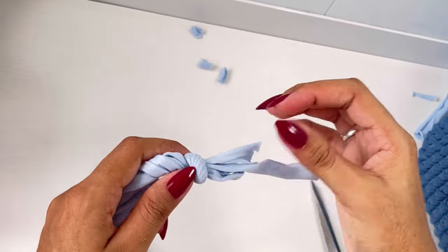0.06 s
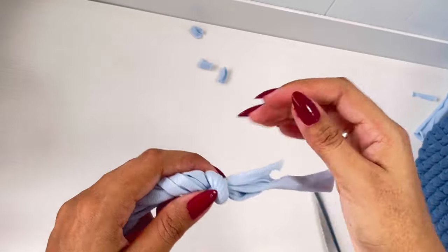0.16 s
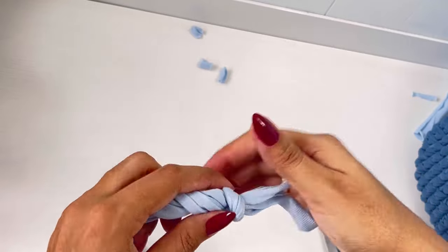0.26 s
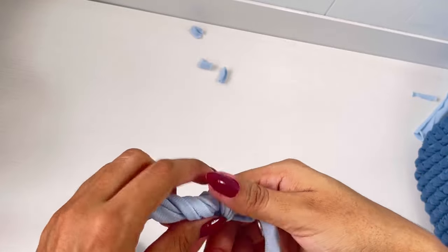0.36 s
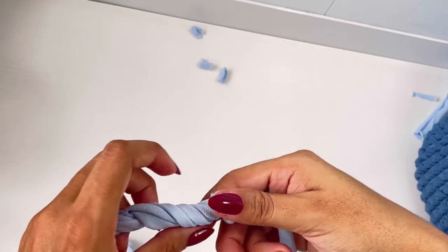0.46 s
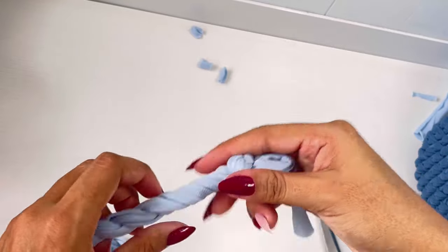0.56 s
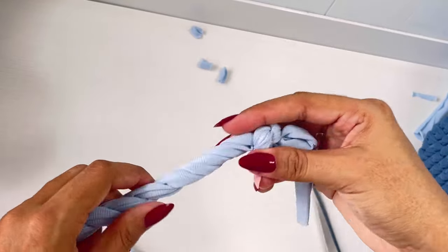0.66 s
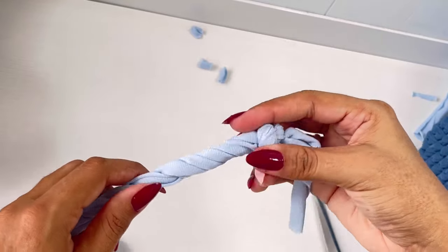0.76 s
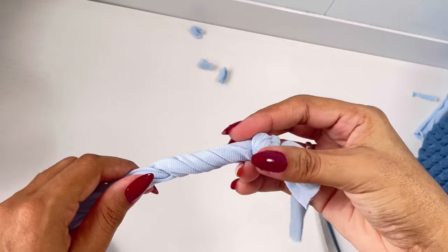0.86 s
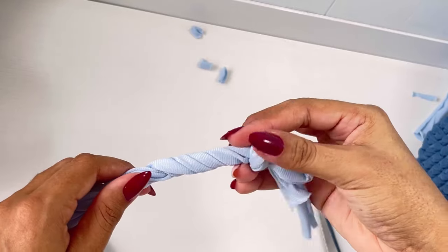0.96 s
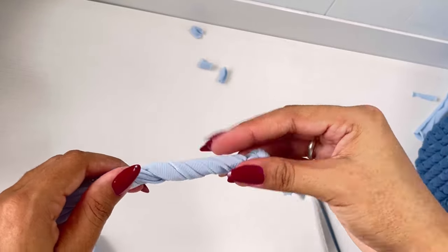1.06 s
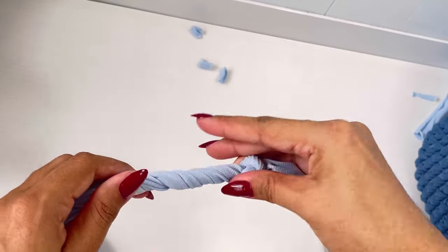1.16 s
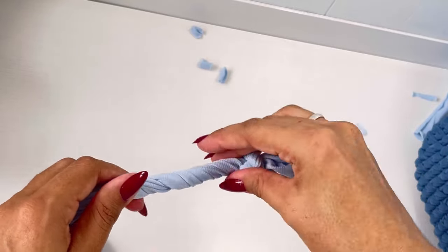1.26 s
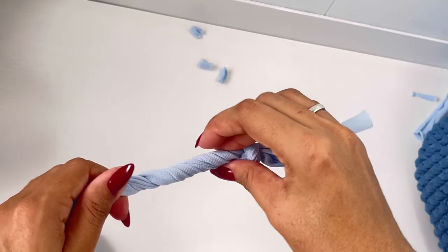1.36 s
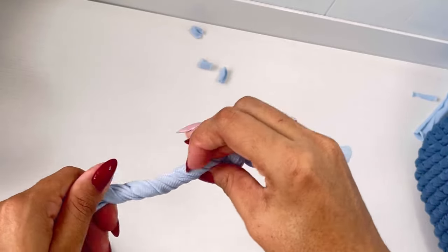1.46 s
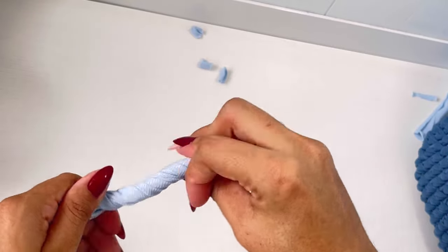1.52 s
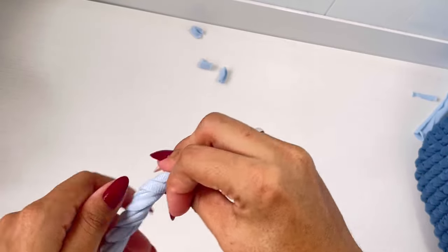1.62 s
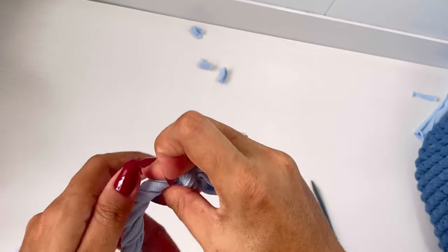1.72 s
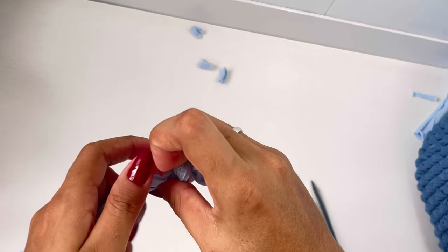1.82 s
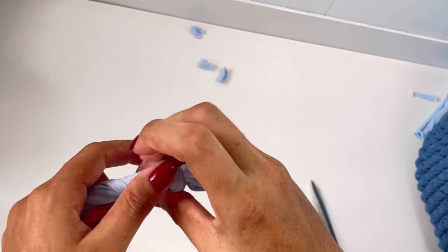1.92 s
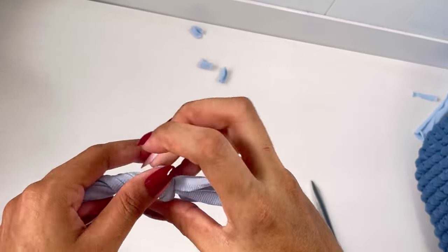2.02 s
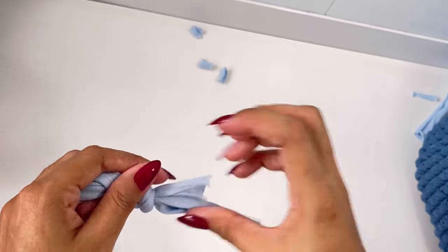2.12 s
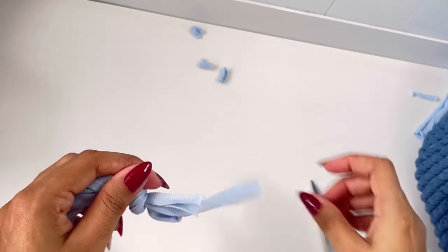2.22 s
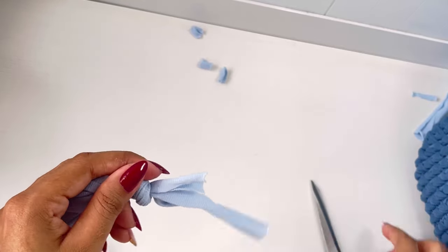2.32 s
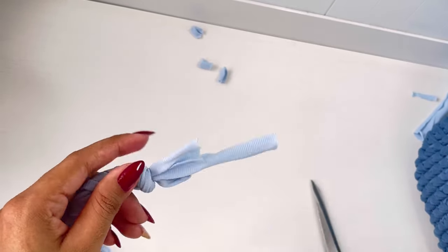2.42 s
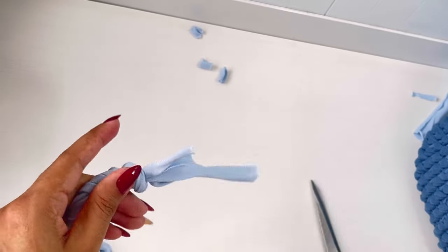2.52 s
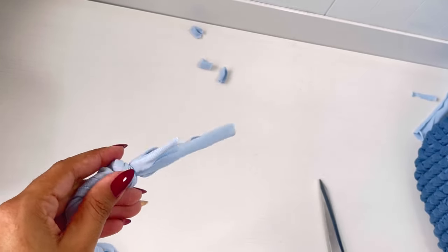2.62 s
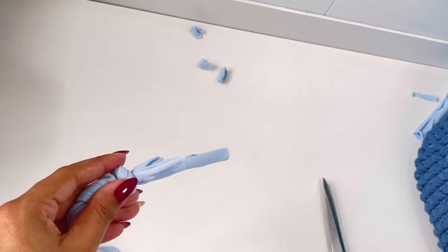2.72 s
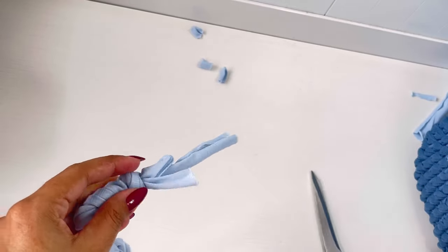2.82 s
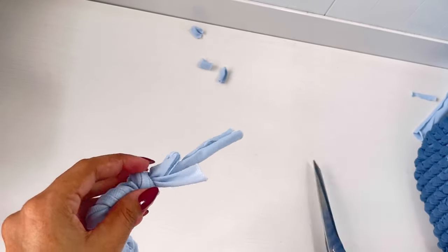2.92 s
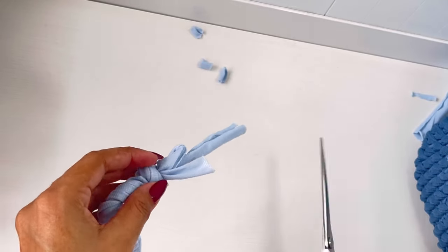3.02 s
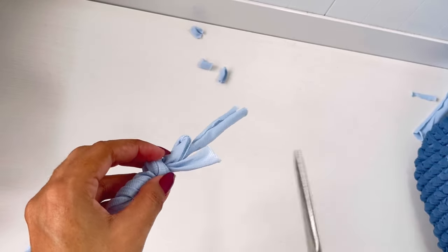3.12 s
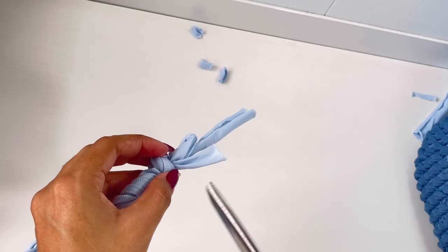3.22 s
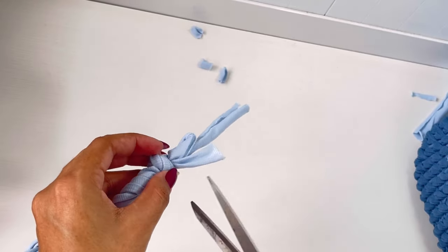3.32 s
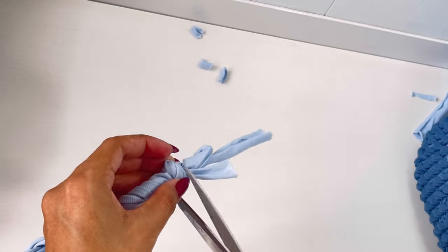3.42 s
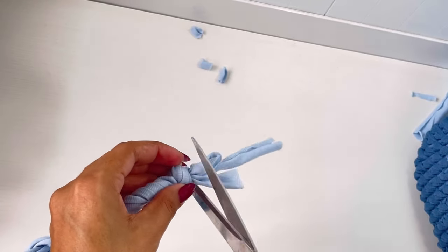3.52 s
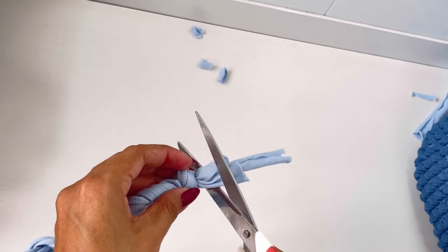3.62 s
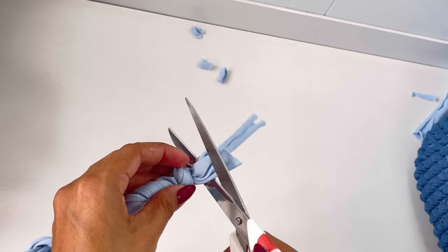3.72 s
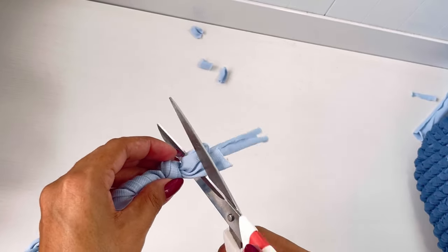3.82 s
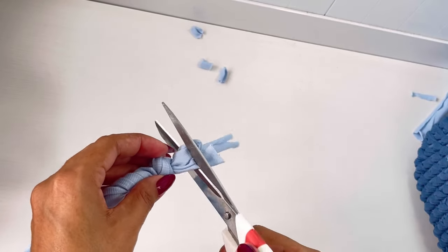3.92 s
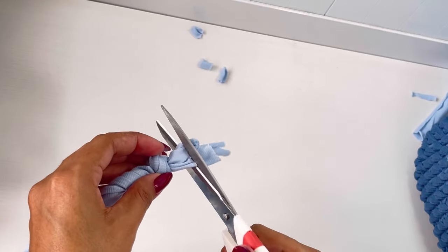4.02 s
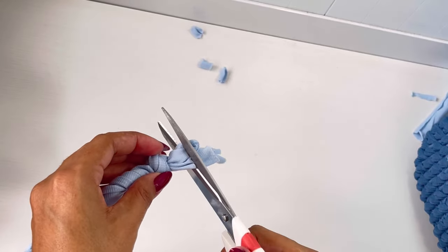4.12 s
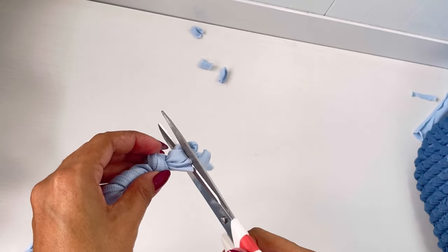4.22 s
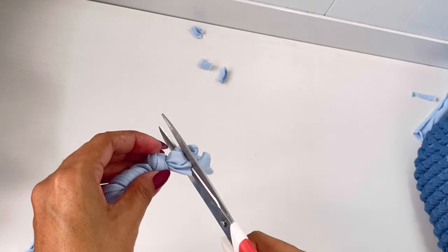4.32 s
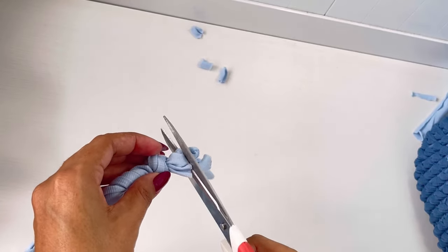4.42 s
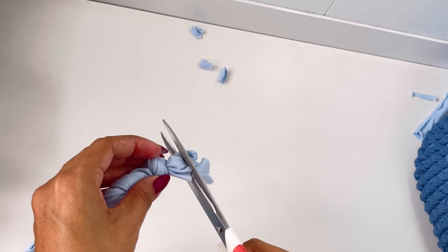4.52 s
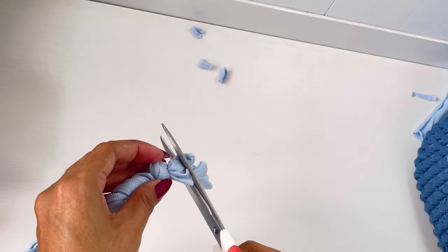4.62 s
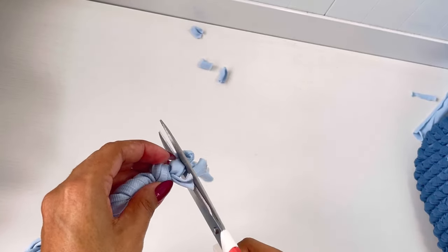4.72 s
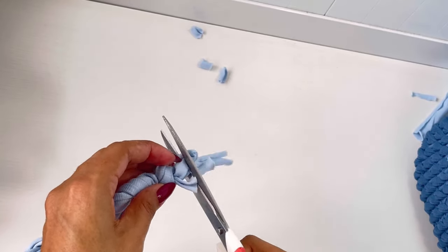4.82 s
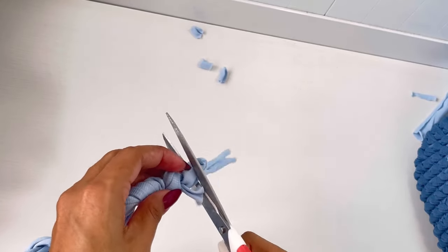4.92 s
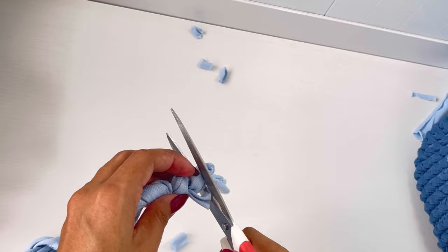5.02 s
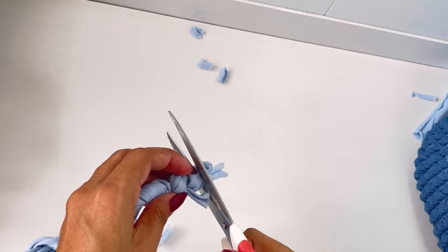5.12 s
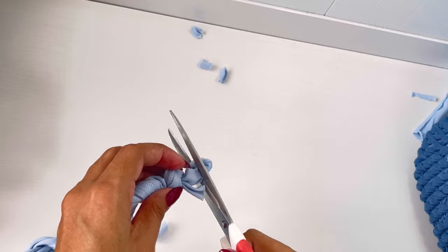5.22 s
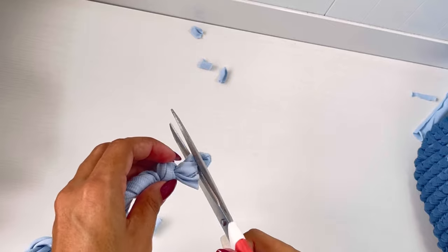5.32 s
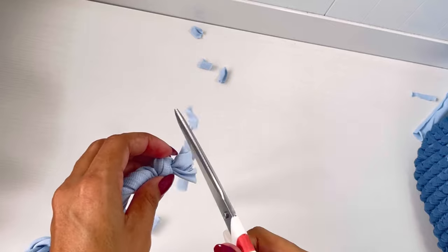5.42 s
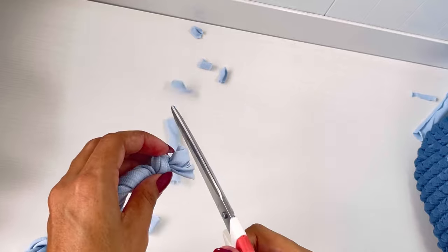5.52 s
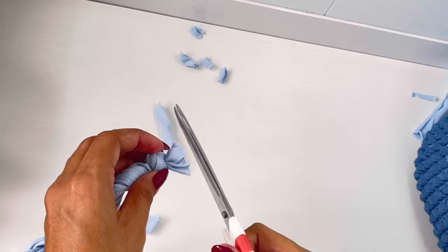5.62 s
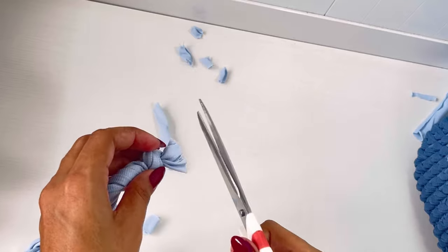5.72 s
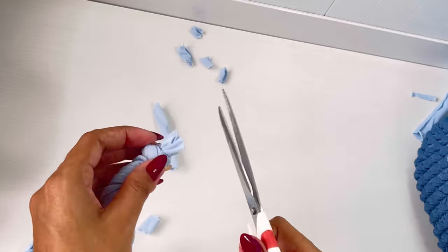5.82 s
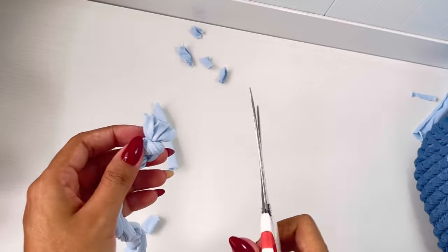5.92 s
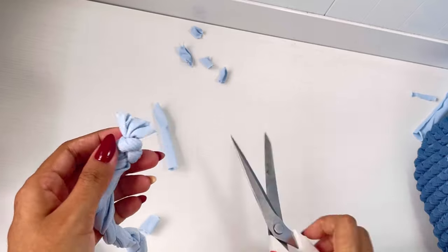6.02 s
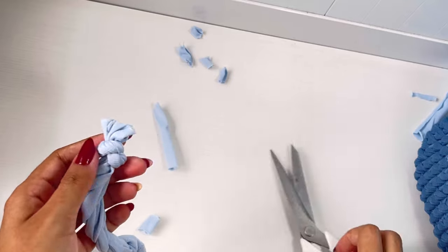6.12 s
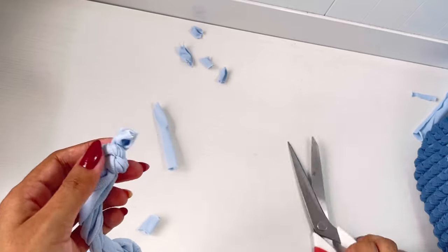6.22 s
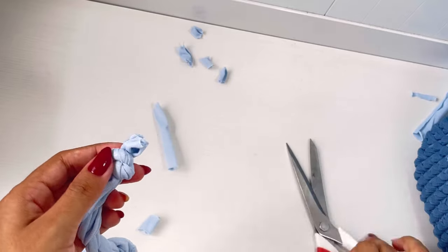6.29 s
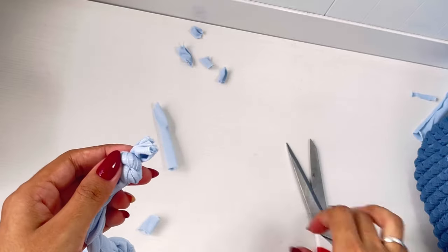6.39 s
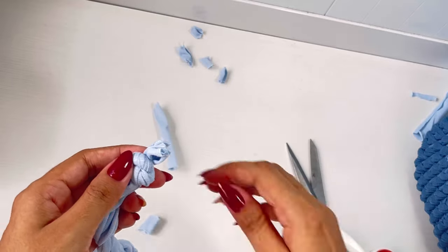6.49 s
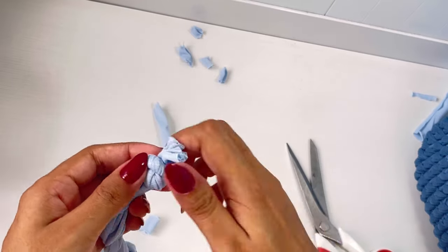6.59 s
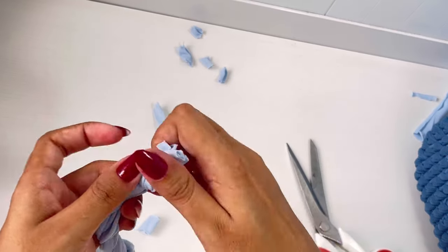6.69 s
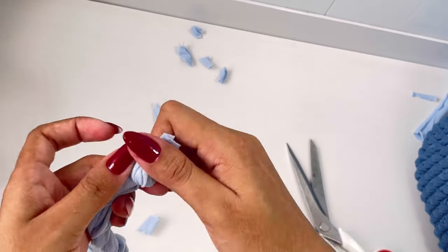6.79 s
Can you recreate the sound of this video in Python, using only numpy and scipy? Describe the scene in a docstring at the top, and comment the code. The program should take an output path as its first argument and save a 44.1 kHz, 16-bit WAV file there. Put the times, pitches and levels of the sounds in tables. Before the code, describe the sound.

Soft, dry fabric rubbing opens over a quiet indoor hum. Dull knocks of scissors against a hard table come next, then a small steel click and juddering shears through knotted cloth. After a pause, more cutting finishes with a crisp, bright snap. Light clicks precede the loudest moment, scissors landing and rattling on the table, before faint handling. Close and mostly dry, with a slight short diffuse room echo.

```python
"""Room first: low building rumble and soft air from filtered noise, then soft rubbing of fingers on jersey yarn.
Quiet room, hard table top, steel scissors close under a phone with two microphone ports.
The scissors are knocked and lifted, judder through the cloth and snap shut, then drop back and rattle.
Rubbing is swelling noise; knocks, cuts and clicks are gritty contact noise, heard bare and through decaying modes.
A short diffuse echo places the close sounds in the room."""
import sys
import numpy as np
from scipy import signal
from scipy.fft import rfft, irfft
from scipy.io import wavfile
from scipy.ndimage import uniform_filter1d

SR = 44100
rng = np.random.default_rng(int(sys.argv[2]) if len(sys.argv) > 2 else 0)


def to_wav(s):
    """Save 16-bit WAV."""
    ch = np.atleast_2d(s).T  # columns
    pcm = np.round(np.clip(ch, -1, 1) * 32767)  # PCM
    wavfile.write(sys.argv[1], SR, pcm.astype(np.int16))


N = 302168
TIME_S = np.arange(N) / SR
HZ = np.maximum(np.fft.rfftfreq(N, 1 / SR), 1)

# Levels are relative drive levels unless noted.
# spectral shape of the room noise, each band levelled later: frequency_hz, density_db [dB per Hz]
AIR_SHAPE = [(18, -44), (30, -10.5), (47, -6), (70, 7.5), (98, -9), (118, -4), (161, -6.5), (215, -25),
             (584, -30), (1190, -39), (1860, -40.5), (4420, -62), (5450, -67.5), (7870, -67.5),
             (16000, -75)]
# level of the low rumble, wavering at random, and of the soft air above 220 Hz: time_s, rumble_db, air_db
BACKGROUND_LEVEL = [(0.0, -42, -62.5), (0.4, -43, -62), (0.72, -40.5, -63), (1.2, -45.5, -64),
                    (2.0, -43.5, -62), (3.1, -43, -60.5), (3.5, -46, -62.5), (4.5, -45.5, -63),
                    (5.17, -43, -62.5), (5.6, -43, -60.5), (6.0, -42, -57.5), (6.62, -44, -53.5),
                    (6.85, -44, -55)]
# faint steady tone somewhere in the room: frequency_hz, width_hz, level_db
WHINE = (1540, 46, -79)
# how unlike the two ports hear diffuse sound: frequency_hz, side_share [side to mid ratio]
SIDE_SHARE = [(130, 0.0034), (250, 0.3), (600, 0.91), (1700, 0.92), (2200, 0.51), (7000, 0.19), (11000, .2),
              (16000, 0.23)]
# echo of the room, band by band: centre_hz, t60_s, level_db
ROOM_ECHO = [(141, 0.47, -20), (377, 0.54, -22.5), (983, 0.52, -16.5), (2380, 0.6, -12.5),
             (5000, 0.42, -18.5), (7250, 0.37, -16), (10600, 0.26, -14)]
# soft rubbing: fingers on yarn, scissors being handled, hands moving: peak_s, swell_s, hiss_db, rub_db
RUBS = [(.36, 0.023, -77, -78), (.56, 0.28, -88, -79), (.64, 0.13, -81, -78), (.81, .12, -75.5, -86),
        (1.04, .06, -84, -100), (1.385, .1, -76.5, -94), (1.5, 0.055, -69, -87), (1.585, .04, -74.5, -78),
        (1.887, .015, -77, -81), (1.95, .05, -70.5, -88), (2.065, 0.04, -60, -65), (2.165, 0.063, -85, -72),
        (2.63, 0.3, -81, -67), (2.955, 0.12, -76, -80), (3.11, 0.19, -81, -75), (3.545, 0.081, -73.5, -69),
        (3.69, 0.17, -81, -83), (4.535, 0.022, -70, -81), (4.77, .02, -76, -88), (4.807, .02, -74, -81),
        (4.86, 0.11, -83, -81), (4.979, 0.099, -80, -68.5), (5.93, .3, -98.5, -74.5),
        (6.641, 0.17, -98, -74), (6.8, 0.29, -93, -70)]
# edges shearing the cloth, one table per squeeze: time_s, edge_level_db
CUTS = [
    [(3.862, -71), (3.904, -54.5), (3.944, -52.5), (3.958, -51), (3.97, -47.5), (3.98, -57), (4.008, -46),
     (4.016, -57), (4.026, -52), (4.056, -55), (4.064, -51.5), (4.09, -53), (4.1, -61)],
    [(4.165, -55), (4.173, -50), (4.185, -50), (4.215, -38.5), (4.228, -59)],
    [(5.104, -82), (5.134, -48), (5.182, -60), (5.188, -50), (5.202, -46), (5.222, -58), (5.238, -40.5),
     (5.246, -47.5), (5.272, -35.5), (5.28, -69)],
    [(5.3, -61), (5.388, -52), (5.402, -38.5)],
]
# crunch of the cloth relative to the edge noise, one per squeeze: crunch_db
CUT_CRUNCH = [-14, -12.5, -10.5, -4]
# short sounds of the scissors: clicks, brief slips and the sharp start of a cut:
# start_s, treble_db, crunch_db, ring_out_s
SHORT_SOUNDS = [(3.2373, -43, -41.5, 0.0087), (3.241, -29, -43.5, 0.017), (3.251, -38, -55, 0.038),
                (5.127, -44.5, -59, 0.035), (5.4035, -12, -34, 0.011), (5.406, -10.5, -21.5, 0.0036),
                (5.631, -56, -48, 0.022), (5.643, -33.5, -39.5, 0.012), (5.652, -53, -39, 0.0071),
                (5.947, -55.5, -52.5, 0.0033), (5.982, -48, -52, 0.007), (5.9915, -43, -49.5, 0.0043),
                (6.033, -38.5, -42, 0.011), (6.0413, -34.5, -45.5, 0.0048), (6.047, -43.5, -44.5, 0.042)]
# scissors meeting the table: start_s, steel_crack_db, handle_clack_db, table_ring_db, table_thump_db,
# chatter_s [nominal length, scaled for each layer]
KNOCKS = [(2.383, -50, -45, -40, -41, 0.016), (2.396, -46, -50, -32.5, -38, 0.012),
          (2.407, -32, -34, -28, -37, 0.0078), (2.539, -53, -33, -20, -44, 0.0069),
          (2.603, -70.5, -56, -39, -44, 0.037), (2.727, -45.5, -53, -38.5, -44, 0.017),
          (2.753, -46, -48, -46.5, -48, 0.0067), (2.7828, -38, -22.5, -17, -31, 0.0072),
          (2.796, -37, -37, -25, -35.5, 0.0064), (6.081, -4.5, -12.5, -10, -21, 0.014),
          (6.123, -26, -26.5, -20.5, -35, 0.013), (6.1701, -10, -11.5, -16.5, -24.5, 0.0064),
          (6.198, -28, -28, -21.5, -32, 0.024), (6.3185, -22, -22, -10.5, -29.5, 0.013),
          (6.345, -24.5, -34, -22.5, -30, 0.032)]
# heavy low modes of the table top: frequency_hz, level_db, t60_s
TABLE_LOW_MODES = [(75, -14, .12), (123, 0, .135), (160, -7, .08), (192, -4, .11), (250, -12, .06)]
# ringing modes of the table top: frequency_hz, level_db, t60_s
TABLE_RING_MODES = [(295, 0, .07), (355, 1, .08), (410, 2, .08), (510, -1, .05), (595, -1, .07),
                    (680, -5, .05), (766, -5.5, .15), (838, -5, .06), (1065, -7, .04)]
# modes of the scissor handles: frequency_hz, level_db, t60_s
HANDLE_MODES = [(1350, -3, .02), (1600, -1, .02), (1920, 1, .02), (2190, 1, .03), (3070, -5, .025),
                (3400, -5, .07), (3900, -6, .02), (4560, -3, .03), (4755, -6, .07)]
# modes of the blades: frequency_hz, level_db, t60_s
BLADE_MODES = [(7450, 3.5, .007), (8960, -5, .01), (10300, -4, .006), (11550, -4, .008), (12460, -6, .005),
               (13400, -7, .005), (15300, -6, .005)]
# phase between the microphone ports: frequency_hz, left_lead_rad
PORT_PHASE = [(0, 0), (130, .04), (300, .4), (800, 1.1), (1120, .6), (1500, -.5), (1900, -.3), (2700, -1.6),
              (3700, -.6), (4500, -1), (5400, -3.14), (6200, -4.2), (8500, -5), (10000, -5.6),
              (12500, -6.3), (15500, -7)]
# level between the microphone ports: frequency_hz, left_minus_right_db
PORT_TILT = [(200, 0), (400, -1.5), (700, -3), (1300, .5), (4000, .2)]

HISS_DB = -73.5  # steady air above 1800 Hz
SWELL_DB, LET_GO = 20.5, 0.5  # rise over the swell; the fall takes this share of it
JUDDER_S, JUDDER_DB = 0.006, 5  # the edges stick and slip: step, spread
SLIP_RING_DB = -4  # share of the blade modes while cutting
# after each knock the loose steel touches down ten more times, on average ever weaker
RATTLE_TOUCHES, RATTLE_GAP_S, RATTLE_S = 10, 0.0065, 0.008  # count, median gap, length of each
RATTLE_FIRST_DB, RATTLE_STEP_DB, RATTLE_SCATTER_DB = -14, -1.89, 2
THUMP_DELAY_S, THUMP_PUSH_S = 0.0036, 0.002
LOW_CUT_HZ, TOP_HZ = 45, 15750  # limits of the phone


def undb(db):
    """Decibels to amplitude."""
    return 10 ** (np.asarray(db) / 20)


def unit(x):
    """Scale to an RMS of one."""
    return x / np.sqrt(np.mean(x ** 2))


def along(table):
    """A (Hz, value) table read at every frequency, on a log scale."""
    hz, value = np.transpose(table)
    return np.interp(np.log(HZ), np.log(np.maximum(hz, 1)), value)


def band(x, lo_hz, hi_hz):
    """Keep the sound between two frequencies."""
    return signal.sosfilt(signal.butter(2, [lo_hz, hi_hz], "band", fs=SR, output="sos"), x)


def ring(x, modes, wander_db):
    """Decaying modes, scaled to keep white-noise power; each is fed more or less as the contact point moves."""
    out, power = 0, 0
    knots = np.arange(0, N, SR // 25)
    for hz, db, t60 in modes:
        r = np.exp(-np.log(1000) / (t60 * SR))
        w = 2 * np.pi * hz / SR
        wander = np.interp(np.arange(N), knots, rng.standard_normal(len(knots)))
        fed = x * undb(wander_db * wander)
        out = out + undb(db) * signal.lfilter([0, np.sin(w)], [1, -2 * r * np.cos(w), r * r], fed)
        power += undb(2 * db) / (2 - 2 * r * r)
    return out / np.sqrt(power)


def strokes(times, dbs, lengths, shape):
    """Envelope track: shape(0..1) laid out at each time."""
    out = np.zeros(N)
    for s, db, length in zip(times, dbs, lengths):
        n = max(int(length * SR), 8)
        i = int(s * SR)
        out[i:i + n] += undb(db) * shape(np.arange(n) / n)[:N - i]
    return out


def dying(u):
    """Contact that starts fast and dies away."""
    return np.exp(-3.5 * u) * (1 - np.exp(-16 * u))


def push(u):
    """Smooth single push."""
    return np.sin(np.pi * u) ** 2


def grit(scatter_db):
    """Noise whose samples differ in size, as from many tiny contacts."""
    size = uniform_filter1d(rng.standard_normal(N), size=12) * np.sqrt(12)
    return unit(rng.standard_normal(N) * undb(scatter_db * size))


def diffuse(draw):
    """Two ports hear a diffuse field alike except where the side share is high."""
    share = np.clip(along(SIDE_SHARE), 0, 1)
    mid = rfft(draw(), N)
    side = rfft(draw(), N) * share
    return np.array([irfft(mid + side, N), irfft(mid - side, N)]) / np.sqrt(2)


def air():
    """Wavering low rumble and soft room air under a steady hiss, with a thin tone made of narrow noise."""
    hz, width, db = WHINE
    lo, hi = hz - width / 2, hz + width / 2
    tone = undb(db) * np.array([unit(band(rng.standard_normal(N), lo, hi)) for _ in range(2)])
    bed = rfft(diffuse(lambda: rng.standard_normal(N))) * undb(along(AIR_SHAPE))
    edges = [(0, 220), (220, 1800), (1800, SR)]
    low, middle, high = (unit(irfft(bed * (HZ >= a) * (HZ < b), N)) for a, b in edges)
    s, *dbs = np.transpose(BACKGROUND_LEVEL)
    rumble_db, air_db = (np.interp(TIME_S, s, db) for db in dbs)
    return undb(rumble_db) * low + undb(air_db) * middle + undb(HISS_DB) * high + tone


def echo():
    """One draw of the room response: noise dying away band by band after a short gap."""
    t = np.arange(SR) / SR
    rise = 1 - np.exp(-np.maximum(t - 0.004, 0) / 0.0037)
    response = 0
    for hz, t60, db in ROOM_ECHO:
        noise = unit(band(rng.standard_normal(SR), hz / 1.596, hz * 1.5))
        decay = np.exp(-np.log(1000) * t / t60)
        response = response + undb(db) * 3 / np.sqrt(t60 * SR) * rise * decay * noise
    return response


def rubbing():
    """Soft treble hiss with a duller rub under it, each rub swelling to its peak and falling faster."""
    gain = np.zeros((2, N))
    for s, swell, *dbs in RUBS:
        near = slice(max(int((s - 2 * swell) * SR), 0), int((s + 2 * swell) * SR))
        u = (TIME_S[near] - s) / swell
        gain[:, near] += np.outer(undb(dbs), undb(SWELL_DB * np.minimum(u, -u / LET_GO)))
    hiss_gain, rub_gain = uniform_filter1d(gain, size=300)  # rounds the peaks
    hiss = unit(band(grit(2.5), 5000, 15000))
    rub = unit(band(grit(2.5), 2000, 7600))
    return hiss_gain * hiss + rub_gain * rub


def steel(treble, crunch, ring_db, hollow_db, low_hz):
    """Contact noise heard bare and through the modes of blades and handles."""
    blades = ring(treble, BLADE_MODES, 2.5)
    handles = ring(crunch, HANDLE_MODES, 3)
    bright = 0.85 * band(treble, 5160, 0.45 * SR) + undb(ring_db) * blades
    dull = 1.73 * band(crunch, low_hz, 5700) + undb(hollow_db) * handles
    return bright + dull


def cutting():
    """Edges stick and slip through the cloth, which crunches under them."""
    knots = np.arange(0, TIME_S[-1], JUDDER_S)
    judder = undb(JUDDER_DB * np.interp(TIME_S, knots, rng.standard_normal(len(knots))))
    edge, cloth = 0, 0
    for cut, crunch_db in zip(CUTS, CUT_CRUNCH):
        s, db = np.transpose(cut)
        gain = undb(np.interp(TIME_S, s, db, -150, -150)) * judder  # silent outside the squeeze
        edge = edge + gain
        cloth = cloth + undb(crunch_db) * gain
    return steel(grit(2.9) * edge, grit(2.5) * cloth, SLIP_RING_DB, -30, 1500)


def short_sounds():
    """Clicks, brief slips and the sharp start of a cut, each a dying burst of contact noise."""
    s, treble_db, crunch_db, length = np.transpose(SHORT_SOUNDS)
    treble = grit(3) * strokes(s, treble_db, length, dying)
    crunch = grit(1.1) * strokes(s, crunch_db, length, dying)
    return steel(treble, crunch, -30, -17, 450)


def knocks():
    """Each contact chatters for a few ms and rattles on; the blow pushes the table top into its modes."""
    s, crack_db, clack_db, ring_db, thump_db, chatter = np.transpose(KNOCKS)
    gaps, sizes = rng.standard_normal((2, len(s), RATTLE_TOUCHES))
    again = (s[:, None] + np.cumsum(RATTLE_GAP_S * np.exp(0.4 * gaps), axis=1)).ravel()
    weaker_db = RATTLE_FIRST_DB + RATTLE_STEP_DB * np.arange(RATTLE_TOUCHES) + RATTLE_SCATTER_DB * sizes

    def contacts(db, stretch):
        """Envelope of the first contact and its rattle."""
        first = strokes(s, db, stretch * chatter, dying)
        rattle_db = (db[:, None] + weaker_db).ravel()
        return first + strokes(again, rattle_db, np.full(len(again), RATTLE_S), dying)

    crack = grit(5.2) * contacts(crack_db, 0.94)
    clack = grit(1.4) * contacts(clack_db, 0.92)
    metal = steel(crack, clack, -26, -4, 730)
    blow = grit(3) * contacts(ring_db, 1.2)
    top = ring(blow, TABLE_RING_MODES, 0.34) + undb(7) * band(blow, 220, 1600)
    # the heavy top answers a few ms after the contact
    shove = strokes(s + THUMP_DELAY_S, thump_db, np.full(len(s), THUMP_PUSH_S), push)
    return metal + top + ring(shove, TABLE_LOW_MODES, 0.7)


def scene():
    """Close sounds reach both ports, with their echo, over the room's background."""
    near = rubbing() + cutting() + short_sounds() + knocks()
    echoed = signal.fftconvolve(near[None], diffuse(echo)[:, :SR], axes=1)[:, :N]
    return air() + near + echoed


def record(dry):
    """The two ports differ in phase and a little in level; the phone cuts the deepest bass and the top."""
    lead = np.interp(HZ, *np.transpose(PORT_PHASE))
    # half the difference goes to each port
    turn = np.exp(0.5j * lead) * undb(along(PORT_TILT) / 2)
    pair = irfft(rfft(dry) * np.array([turn, 1 / turn]), N)
    pair = signal.sosfilt(signal.butter(4, LOW_CUT_HZ, "high", fs=SR, output="sos"), pair)
    return signal.sosfilt(signal.ellip(8, 0.2, 70, TOP_HZ, fs=SR, output="sos"), pair)


dry = scene()
out = record(dry)
to_wav(out)
```